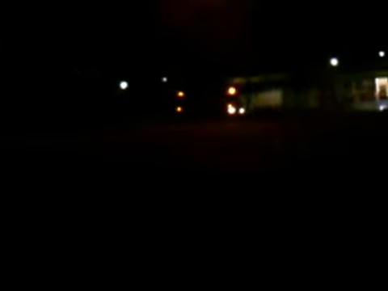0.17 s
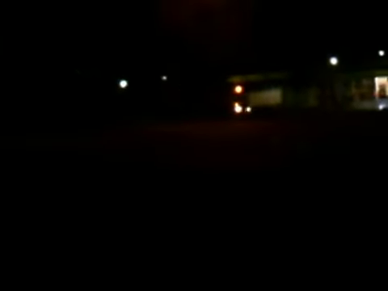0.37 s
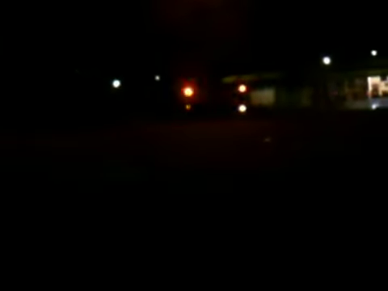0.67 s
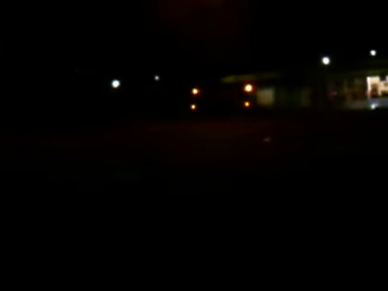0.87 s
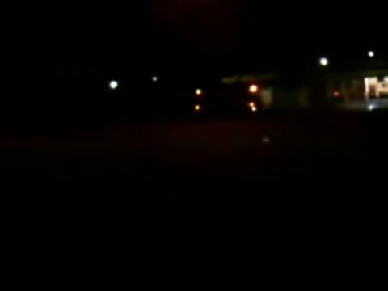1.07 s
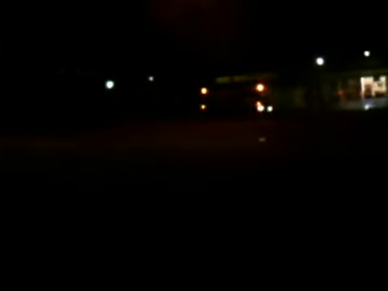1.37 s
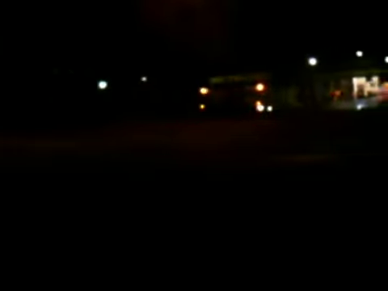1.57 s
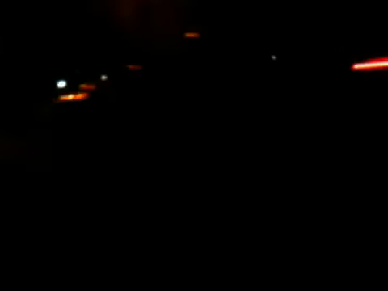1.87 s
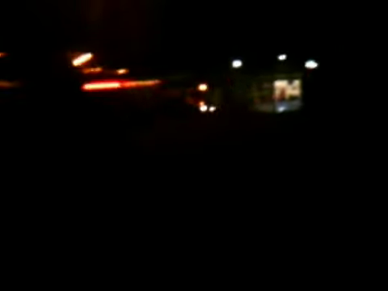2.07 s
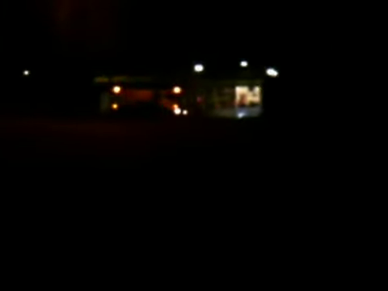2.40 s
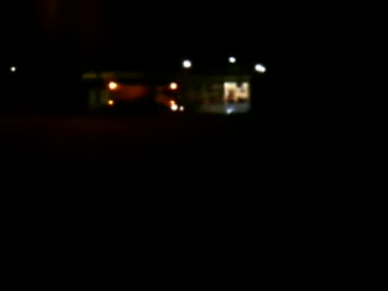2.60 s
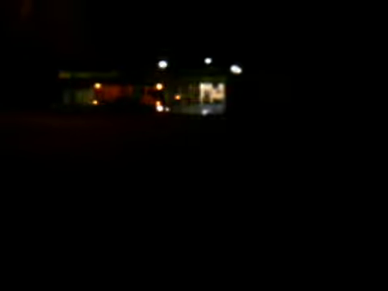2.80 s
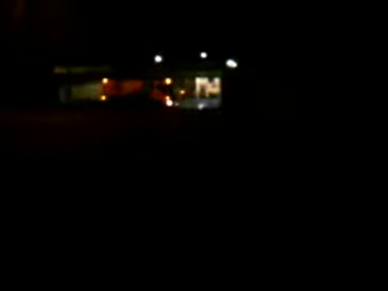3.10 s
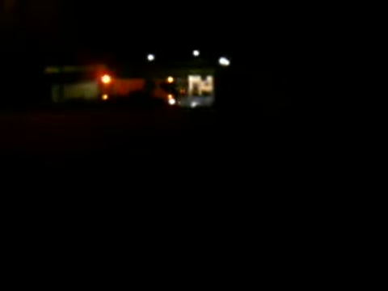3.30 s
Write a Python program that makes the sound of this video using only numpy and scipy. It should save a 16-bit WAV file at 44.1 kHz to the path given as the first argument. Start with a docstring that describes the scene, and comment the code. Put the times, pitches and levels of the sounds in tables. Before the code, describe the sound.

A street sweeper works some way off, with a low diesel drone, a wavering fan hum and a steady rush of brushes. A car passes closer to the microphone, tyres hissing, then its exhaust booms as it leaves.

```python
"""Street sweeper and passing car at night

Some way off, a sweeper works: a diesel drone, a humming suction fan, a steady rush of air and brushes.
A car passes closer by: its tyres roar ahead of it, hiss alongside and roar again behind it,
and then its exhaust booms. Only the bass and the middle come through."""
import sys
import numpy as np
from scipy import signal
from scipy.fft import rfft, irfft
from scipy.io import wavfile
from scipy.ndimage import uniform_filter1d

SR = 44100
rng = np.random.default_rng(int(sys.argv[2]) if len(sys.argv) > 2 else 0)


def wrap_up_sound(samples):
    """Save the sound to the file named by the first command line argument, as 16-bit audio."""
    columns = np.atleast_2d(samples).T
    # keep every value between -1 and 1, then stretch to whole-number steps
    tamed = np.clip(columns, -1, 1)
    steps = np.round(tamed * 32767).astype(np.int16)
    wavfile.write(sys.argv[1], SR, steps)


N = 152145


def amp(db):
    """Decibels to gain."""
    return 10 ** (np.asarray(db) / 20)


def unit_rms(x):
    """Scales to an rms of 1."""
    return x / np.sqrt(np.mean(abs(x) ** 2) + 1e-20)


def curve(points, column=1):
    """One column of a time table, interpolated for every sample."""
    table = np.transpose(points)
    return np.interp(np.arange(N) / SR, table[0], table[column])


def flutter(width_hz):
    """A slow random wobble of level and phase: complex low-passed noise of rms 1."""
    hz = np.fft.fftfreq(N, 1 / SR)
    real, imag = rng.standard_normal((2, N))
    return unit_rms(np.fft.ifft((real + 1j * imag) / (1 + (hz / width_hz) ** 2)))


def tone(pitch_hz, rough, flutter_hz):
    """A wavering tone of rms 1; rough is the size of its flutter against its steady part."""
    carrier = np.exp(2j * np.pi * np.cumsum(pitch_hz * np.ones(N)) / SR)
    return unit_rms((carrier * (1 + rough * flutter(flutter_hz))).real)


def turbulence(spectrum):
    """Noise of rms 1 in a given colour, with faint drifting patches and a flickering level."""
    window, hop = 1024, 256
    patch_db, flicker_db = .88, .3
    frames = N // hop + 9
    real, imag, patches = rng.standard_normal((frames, window // 2 + 1, 3)).T
    patches = uniform_filter1d(patches, size=5, axis=0)  # smooth across frequency
    patches = unit_rms(uniform_filter1d(patches, size=16, axis=1))  # and across time
    flicker = unit_rms(uniform_filter1d(rng.standard_normal(frames), size=5))
    field = (real + 1j * imag) * amp(patch_db * patches + flicker_db * flicker)
    white = signal.istft(field, nperseg=window, noverlap=window - hop)[1][:N]
    points_hz, points_db = np.transpose(spectrum)
    hz = np.fft.rfftfreq(N, 1 / SR)
    colour = amp(np.interp(np.log(hz + 1), np.log(points_hz), points_db))
    low_cut = np.minimum(hz / points_hz[0], 1) ** 2
    return unit_rms(irfft(rfft(white) * colour * low_cut, N))


def diesel_drone():
    """The sweeper's firing note throbs against a faint second bass tone, amid overtones and rumble."""
    # cylinder firing: time_s, rate_hz
    firing_rate = [(0, 51.24), (1.2, 51.16), (3.45, 50.43)]
    # swells of the firing note: time_s, level_db
    firing_level = [(0, -61), (.08, -48), (.2, -33.5), (.3, -39), (.5, -36.5), (.9, -45), (1.25, -39),
                    (1.5, -39.5), (2.15, -33), (2.7, -38.5), (3.45, -53.5)]
    # engine overtones: multiple_of_firing_rate, level_db
    orders = [(1.35, -45.5), (1.65, -44.5), (2, -45), (2.25, -45.5), (3, -43), (3.4, -44), (4.95, -43),
              (5.37, -44.5)]
    # colour of the engine rumble: frequency_hz, relative_db
    rumble_colour = [(20, -36.5), (30, -18.5), (42, -12.5), (58, -7.5), (80, -4), (125, -2), (165, 1.5),
                     (225, 1), (265, -4), (305, -9.5), (420, -18), (800, -60.5)]
    # swells of the rumble: time_s, level_db
    rumble_level = [(0, -34), (.4, -32), (1.0, -31), (1.5, -29.5), (1.8, -34), (2.3, -29.5), (2.7, -31),
                    (3.45, -29)]
    firing_hz = curve(firing_rate)
    note = amp(curve(firing_level)) * tone(firing_hz, rough=.15, flutter_hz=4)
    throb = amp(-48.5) * tone(pitch_hz=42.2, rough=.56, flutter_hz=4)
    overtones = sum(amp(db) * tone(order * firing_hz, rough=.56, flutter_hz=4) for order, db in orders)
    rumble = amp(curve(rumble_level)) * turbulence(rumble_colour)
    return note + throb + overtones + rumble


def suction_fan():
    """The fan's blades hum, and a weaker whine just above beats against them."""
    # blade tone: time_s, pitch_hz
    hum_pitch = [(0, 351.4), (1.0, 352.5), (1.7, 351.0), (2.8, 349.5), (3.45, 351.0)]
    # the hum fades in and out on its way: time_s, level_db
    hum_level = [(0, -45.5), (.08, -28), (.14, -36), (.25, -28.5), (.35, -40), (.45, -28.5), (.54, -39.5),
                 (.6, -27), (.67, -37.5), (.78, -26), (.88, -35.5), (.98, -32.5), (1.19, -30),
                 (1.26, -43.5), (1.39, -33.5), (1.45, -42), (1.5, -29), (1.59, -26), (1.75, -47),
                 (1.84, -32.5), (2.02, -37.5), (2.1, -44), (2.18, -37.5), (2.33, -38), (2.43, -31.5),
                 (2.63, -27), (2.73, -35.5), (2.86, -28.5), (3.15, -30), (3.24, -35), (3.45, -29.5)]
    # late swell of the whine: time_s, level_db
    whine_level = [(0, -57.5), (1.9, -48.5), (2.4, -39), (3.0, -35.5), (3.45, -50.5)]
    hum = amp(curve(hum_level)) * tone(curve(hum_pitch), rough=.15, flutter_hz=16)
    whine = amp(curve(whine_level)) * tone(pitch_hz=368, rough=.15, flutter_hz=16)
    return hum + whine


def air_and_brushes():
    """The sweeper's air and brushes blend into one steady midrange rush."""
    # colour of the rush: frequency_hz, relative_db
    rush_colour = [(150, -13), (310, -3), (440, 2), (650, 0), (950, -2), (1350, -7.5), (1750, -10),
                   (2000, -11.5), (2600, -15.5), (3300, -15.5), (3750, -17), (4000, -21), (4250, -32),
                   (4500, -50)]
    # gentle swells of the rush: time_s, level_db
    rush_level = [(0, -34.5), (.4, -32.5), (1.0, -32.5), (1.55, -30), (2.1, -33.5), (2.5, -31), (3.0, -31),
                  (3.45, -30)]
    return amp(curve(rush_level)) * turbulence(rush_colour)


def car_tyres():
    """Tyres beam their roar forwards and backwards; their hiss peaks as the car draws alongside."""
    # hiss alongside: frequency_hz, relative_db
    hiss_colour = [(1200, -7), (2000, -7.5), (2450, 5.5), (3000, -1), (3700, 1.5), (4000, -5.5),
                   (4250, -12.5), (4500, -32)]
    # brighter roar thrown ahead: frequency_hz, relative_db
    ahead_colour = [(500, -22.5), (1050, -8), (1330, -1), (1720, -2.5), (2050, -6.5), (2700, -13),
                    (3800, -20), (4400, -53)]
    # its build on the approach: time_s, level_db
    ahead_level = [(0, -51), (.4, -41), (.8, -38.5), (1.19, -35.5), (1.26, -32), (1.35, -36.5), (1.5, -37),
                   (1.68, -47.5), (2.0, -63)]
    # darker roar thrown behind: frequency_hz, relative_db
    behind_colour = [(400, -21), (720, -2.5), (950, -0.5), (1200, -3), (1450, -7.5), (1800, -5),
                     (2100, -13), (3000, -16.5), (3800, -19), (4400, -47)]
    # its swell and fade as the car leaves: time_s, level_db
    behind_level = [(1.3, -53), (1.65, -39), (1.85, -33.5), (2.21, -32), (2.4, -40), (2.7, -51),
                    (3.45, -49)]
    hiss_peak_db, nearest_s, half_width_s = -41.5, 1.56, .28
    nearness = 1 / (1 + ((np.arange(N) / SR - nearest_s) / half_width_s) ** 2)
    hiss = amp(hiss_peak_db) * nearness * turbulence(hiss_colour)
    roar_ahead = amp(curve(ahead_level)) * turbulence(ahead_colour)
    roar_behind = amp(curve(behind_level)) * turbulence(behind_colour)
    return hiss + roar_ahead + roar_behind


def car_exhaust():
    """A rough note that drops in pitch at the pass and booms as the car leaves."""
    # exhaust note: time_s, pitch_hz, level_db
    note = [(0, 228, -39), (.6, 229.3, -39.5), (.9, 234, -35.5), (1.25, 238, -34), (1.35, 215.9, -37),
            (1.45, 190, -32.5), (1.62, 191.6, -32), (1.73, 198, -45.5), (1.9, 202, -36),
            (2.04, 202.1, -28.5), (2.27, 200.1, -31), (2.45, 200, -35), (2.83, 197, -40.5),
            (2.94, 196, -27), (3.17, 200, -30.5), (3.29, 208, -27.5), (3.45, 210, -40.5)]
    return amp(curve(note, column=2)) * tone(curve(note), rough=.84, flutter_hz=26)


def scene():
    """The distant sweeper and the closer car, in mono."""
    sweeper = diesel_drone() + suction_fan() + air_and_brushes()
    car = car_tyres() + car_exhaust()
    return (sweeper + car)[None]


def record(dry):
    """The recorder's steep low-pass keeps only the bass and the middle."""
    cutoff_hz = 4500
    taps = signal.firwin(601, cutoff_hz, window=("kaiser", 9), fs=SR)
    return signal.oaconvolve(dry, taps[None], "same")


dry = scene()
out = record(dry)
wrap_up_sound(out)
```